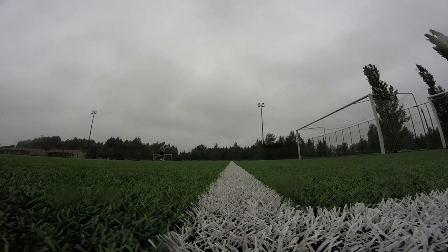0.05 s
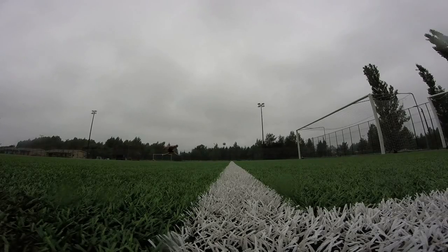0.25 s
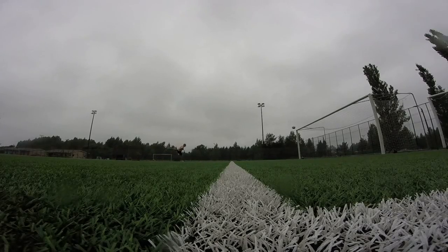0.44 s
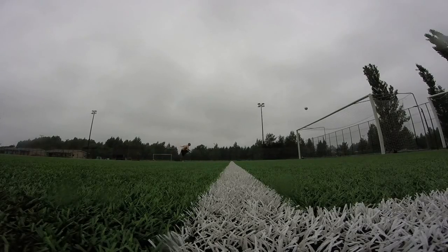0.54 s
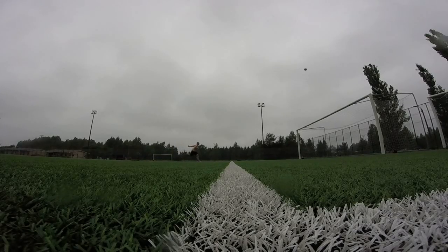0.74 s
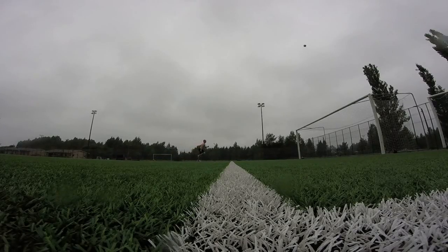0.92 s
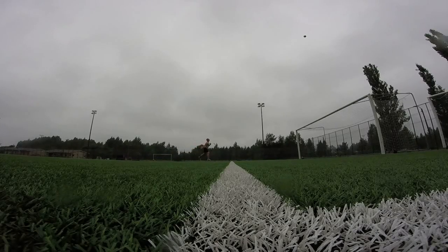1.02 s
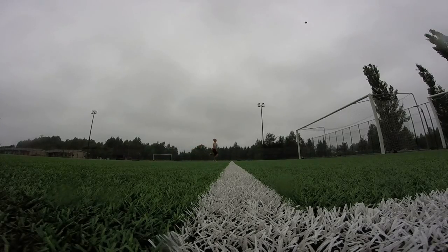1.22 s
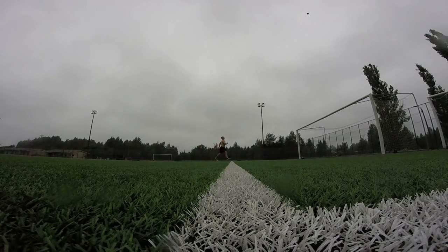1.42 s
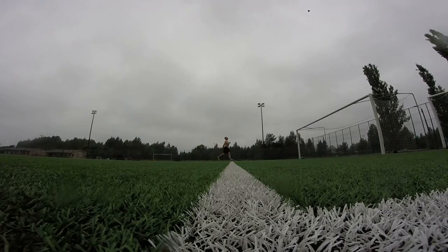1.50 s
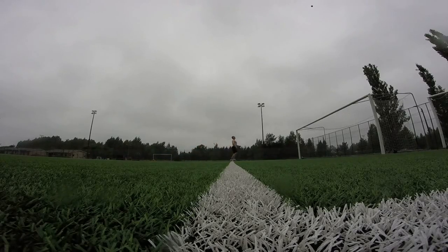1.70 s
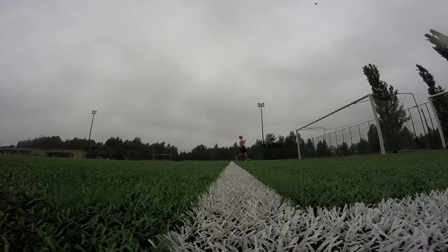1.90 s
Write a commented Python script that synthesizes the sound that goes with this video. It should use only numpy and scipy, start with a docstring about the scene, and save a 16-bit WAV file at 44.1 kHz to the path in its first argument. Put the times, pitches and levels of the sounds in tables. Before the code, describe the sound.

On an open grass pitch, a dull heavy kick is soon followed by the ball thudding on the crossbar with a sharp metallic clang; fittings rattle, the frame shudders, a few soft steps follow, in mono.

```python
"""On an open grass pitch a football is kicked and hits the metal crossbar: two deep thuds.
The second thud comes with a crack and a clang: bursts of noise, over fading tones of the ringing frame.
Each ball blow is made of two sharp pulses, a low swing, fluttering noise and short fading tones.
Shaped noise makes the rattling fittings, the far edge's echo, the scuffing feet and the light wind.
A wavering low tone is a distant drone."""
import sys
import numpy as np
from scipy.fft import rfft, irfft, next_fast_len
from scipy.io import wavfile
from scipy.ndimage import map_coordinates

SR = 44100
rng = np.random.default_rng(int(sys.argv[2]) if len(sys.argv) > 2 else 0)


def generate_wav(sig):
    """Save sig (samples, or channels by samples) to the path in sys.argv[1] as 16-bit PCM at SR."""
    pcm = np.round(np.clip(np.atleast_2d(sig).T, -1, 1) * 32767).astype(np.int16)
    wavfile.write(sys.argv[1], SR, pcm)


N = 85995  # length of the scene [samples]


def amp(db):
    """Turn decibels into a gain."""
    return 10 ** (np.asarray(db) / 20)


def unit(x):
    """Scale a sound to an rms of 1."""
    return x / np.sqrt(np.mean(x ** 2) + 1e-20)


def since(start_s):
    """Seconds since a moment, zero before it."""
    return np.maximum(np.arange(N) / SR - start_s, 0)


def gains(points, hz):
    """Read a gain off a curve of (frequency [Hz], level [dB]) points, on a log frequency axis."""
    point_hz, point_db = np.transpose(points)
    return amp(np.interp(np.log(hz + 1), np.log(point_hz + 1), point_db))


def filtered(x, response):
    """Weigh each frequency of a sound by a response curve."""
    size = next_fast_len(N + SR // 2)  # spare room so the end does not wrap onto the start
    spectrum = rfft(x, size) * response(np.fft.rfftfreq(size, 1 / SR))
    return irfft(spectrum, size)[:N]


def noise(colour):
    """Random hiss shaped by a colour curve, with an rms of 1."""
    hiss = rng.standard_normal(N)
    return unit(filtered(hiss, lambda hz: gains(colour, hz)))


def wobble(rate):
    """A smooth random curve through `rate` random points a second."""
    points = rng.standard_normal(1024)
    return map_coordinates(points, [np.arange(N) * rate / SR], mode="wrap")


def fade(t, t60):
    """Exponential decay that falls by 60 dB in t60 seconds."""
    return np.exp(-np.log(1000) * t / t60)


def bump(centre_s, width_s):
    """A smooth bell-shaped rise and fall in time."""
    return np.exp(-np.square((since(0) - centre_s) / width_s))


def burst(colour, start_s, db, rise, t60):
    """Noise that swells quickly and dies away."""
    t = since(start_s)
    envelope = (1 - np.exp(-t / rise)) * fade(t, t60)
    return amp(db) * noise(colour) * envelope


def ring(modes, start_s, rough, rate):
    """A struck body's fading tones, each slightly rough because its phase wanders."""
    t = since(start_s)
    tones = 0
    for hz, db, t60 in modes:
        wander = rough * wobble(rate) * (1 - np.exp(-t * rate))
        tones = tones + amp(db) * fade(t, t60) * np.sin(2 * np.pi * hz * t + wander)
    rise_s = .0012
    return tones * (1 - np.exp(-np.square(t / rise_s)))


def slap(colour, start_s, size=4096):
    """One sharp pressure pulse of peak 1, with nothing before its start."""
    # folding the cepstrum packs the pulse's energy as early as its colour allows
    cepstrum = irfft(np.log(gains(colour, np.fft.rfftfreq(size, 1 / SR))))
    cepstrum[1:size // 2] *= 2
    cepstrum[size // 2 + 1:] = 0
    pulse = irfft(np.exp(rfft(cepstrum)))
    pulse = pulse / np.abs(pulse).max()
    return np.interp(np.arange(N) - start_s * SR, np.arange(size), pulse, left=0, right=0)


def thump(start_s, db, hz, length):
    """A heavily damped low swing that starts softly and carries no steady push."""
    low_cut_hz, soft_s = 55, .0005
    t = since(start_s)
    envelope = np.exp(-(t / length) ** 4) * (1 - np.exp(-np.square(t / soft_s)))
    swing = -amp(db) * np.sin(2 * np.pi * hz * t) * envelope
    return filtered(swing, lambda f: 1 - np.exp(-np.square(f / low_cut_hz)))


# colour of the light wind and far trees: (frequency [Hz], relative level [dB])
AIR_COLOUR = [(20, -6), (35, -2), (55, 7), (80, 6), (110, 3), (160, 1), (250, 1), (400, -1.5), (620, -.5),
              (830, 0), (1000, -5.5), (1250, -15), (1600, -20), (2050, -21), (2400, -26), (3000, -23),
              (3700, -19), (4500, -20), (5400, -28), (6700, -22.5), (7700, -32), (8400, -31), (9500, -38),
              (12300, -41), (13500, -48), (15000, -49)]


def air():
    """Light wind is gently swaying noise; the far-off drone is a low tone wavering in pitch and level."""
    drone_hz, drone_db, waver_rate = 70.5, -48.5, 8  # the rate is in random points a second
    tone = np.sin(2 * np.pi * drone_hz * since(0) + .8 * wobble(waver_rate))
    drone = tone * amp(2 * wobble(waver_rate))
    wind = amp(-42 + .5 * wobble(6)) * noise(AIR_COLOUR)
    return wind + amp(drone_db) * unit(drone)


# colour of the dull noise under the kick and in the echo: (frequency [Hz], relative level [dB])
ECHO_COLOUR = [(20, -30), (70, -12), (160, 4), (300, -1), (470, -2), (600, -5), (1050, -8), (1350, -23),
               (1700, -24), (2500, -40), (6000, -55), (15000, -70)]


def echo():
    """Dull noise begins just before the kick and fades under it; a later swell is the far edge's echo."""
    far_edge = amp(-32.5) * noise(ECHO_COLOUR) * bump(centre_s=.858, width_s=.038)
    dull_fade = burst(ECHO_COLOUR, start_s=.2295, db=-37, rise=.003, t60=.45)
    return far_edge + dull_fade


# footfalls: (time [s], thump level before its low cut [dB], thump pitch [Hz], scuff level [dB])
STEPS = [(0.1315, -40, 200, -28.5), (0.1400, -26, 160, -37), (0.540, -30, 165, -39),
         (1.2708, -22.5, 145, -42), (1.666, -33, 170, -41)]
# colour of the dull scuff under each foot: (frequency [Hz], relative level [dB])
SCUFF_COLOUR = [(20, -25), (80, -8), (220, 1), (700, -3), (1100, -12), (1700, -32), (5000, -50),
                (15000, -70)]
# the boot brushing the grass: (time [s], level [dB], rise [s], fade by 60 dB [s])
BRUSHES = [(0.2163, -38, .0005, .012), (0.2335, -46, .0004, .008), (0.238, -40.5, .0005, .016)]
# colour of the brushed grass: (frequency [Hz], relative level [dB])
BRUSH_COLOUR = [(1500, -15), (3500, -2), (7000, -4), (9000, 0), (12000, -5), (14000, -22)]


def feet():
    """Each step is a low thump with a noisy scuff; the boot swishes through the grass as short noise."""
    steps = 0
    for start_s, thump_db, hz, scuff_db in STEPS:
        steps = steps + thump(start_s, thump_db, hz, length=.012)
        steps = steps + burst(SCUFF_COLOUR, start_s, scuff_db, rise=.001, t60=.07)
    swish = sum(burst(BRUSH_COLOUR, *row) for row in BRUSHES)
    return steps + swish


# sharp metal contacts: (time [s], level [dB], rise [s], fade by 60 dB [s])
CLACKS = [(0.6105, -31, .003, .1), (0.6207, -14, .0003, .008), (0.6215, -33.5, .001, .06),
          (0.6366, -26, .0003, .015), (0.653, -40.5, .002, .07), (0.682, -41, .001, .02),
          (0.698, -39.5, .006, .12), (0.725, -35, .006, .09), (0.829, -50, .003, .14),
          (0.8415, -40, .001, .035)]
# colour of the sharp contacts: (frequency [Hz], relative level [dB])
CLACK_COLOUR = [(800, -15), (1700, -7), (2400, -19), (2750, -1), (3400, 1), (4400, -4), (5300, -13),
                (6500, 0), (7600, -15), (8600, -15), (9600, -25), (11800, -15), (13500, -23), (15000, -24)]
# colour of a jingling loose fitting: (frequency [Hz], relative level [dB])
JINGLE_COLOUR = [(2500, -20), (3800, 0), (5300, -9), (6500, -2), (7050, 7), (7700, -7), (10000, -9),
                 (12000, -9.5), (15000, -13)]
# tones on which that fitting rings on: (frequency [Hz], level [dB], fade by 60 dB [s])
FITTING_MODES = [(6830, -45, .3), (6980, -48, .25), (7139, -42.5, .28)]


def fittings():
    """The bar cracks and shaken fittings clack in short noise bursts; a loose one jingles and rings on."""
    jingle_s = .730
    clacks = sum(burst(CLACK_COLOUR, *row) for row in CLACKS)
    jingle = burst(JINGLE_COLOUR, jingle_s, db=-38, rise=.005, t60=.11)
    return clacks + jingle + ring(FITTING_MODES, jingle_s, rough=.9, rate=140)


# the swaying frame knocks in its joints: (time [s], level before the low cut [dB], pitch [Hz], length [s])
KNOCKS = [(0.649, -23, 760, .006), (0.6605, -23, 400, .006), (0.707, -25, 410, .014),
          (0.727, -29, 135, .015), (0.830, -27, 230, .011)]


def knocks():
    """Dull knocks as the goal sways, and a brief hum that rises and falls in pitch."""
    centre_s, width_s, top_hz, bend_hz = .848, .05, 482, 70  # the pitch sags by bend_hz one width away
    away = np.minimum(np.square((since(0) - centre_s) / width_s), 20)
    phase = 2 * np.pi * np.cumsum(top_hz - bend_hz * away) / SR + .4 * wobble(30)
    hum = amp(-36.5) * np.exp(-away) * np.sin(phase)
    return hum + sum(thump(*row) for row in KNOCKS)


# tones of the goal frame: (frequency [Hz], relative level [dB], fade by 60 dB [s])
FRAME_MODES = [(235, -31, .4), (332, -19, .12), (415, -39, .6), (465, -32, .9), (530, -29, .35),
               (626, -30, .5), (738, -32, .4), (856, -36, .55), (928, -33, .45), (1124, -40, .35),
               (1222, -41, .3), (1489, -46, .3), (1755, -47, .3), (3165, -47, .35), (3478, -46, .35),
               (3523, -47, .35), (3958, -48, .35)]
# colour of the frame's dense shudder: (frequency [Hz], relative level [dB])
SHUDDER_COLOUR = [(20, -25), (60, -8), (140, 1), (280, 1), (550, -1), (950, -7), (1300, -20), (2100, -26),
                  (2450, -34), (3300, -20), (4400, -23), (5300, -33), (6700, -21), (7700, -34),
                  (10000, -45), (15000, -51)]


def frame(hit_s):
    """The struck goal clangs, rings and shudders; the shudder's treble dies a little sooner."""
    t = since(hit_s)
    shudder = noise(SHUDDER_COLOUR)
    low = filtered(shudder, lambda hz: hz < 2400)
    treble = shudder - low
    tail = (t > 0) * (low * fade(t, t60=1.35) + treble * fade(t, t60=1.25))
    # the clang starts early, as the ball grazes the frame
    clang = burst(SHUDDER_COLOUR, hit_s - .010, db=-20, rise=.004, t60=.15)
    tones = amp(-2) * ring(FRAME_MODES, hit_s, rough=.6, rate=35)
    return amp(-28.5) * tail + clang + tones


# the ball's two blows, each: (time [s], thump level before its low cut [dB], thump pitch [Hz],
# thump length [s], slap level [dB], release level relative to the slap [dB], contact time [s])
KICK = (0.2339, -2.5, 110, .011, -2.2, -9.5, .0105)
BAR_HIT = (0.6208, -3.3, 100, .0115, -6.6, 0, .0109)
# colour of each slap: (frequency [Hz], relative level [dB])
KICK_SLAP_COLOUR = [(20, -22), (90, -5), (250, 3), (380, -1), (620, 0), (900, -6.5), (1300, -16.5),
                    (1550, -38), (1800, -60), (4000, -72), (15000, -80)]
BAR_SLAP_COLOUR = [(20, -22), (90, -5), (300, 4), (620, -2), (950, -6), (1250, -13), (1750, -22),
                   (2450, -35), (3400, -30), (6000, -42), (15000, -58)]
# colour of the skin's flutter while the ball is squashed: (frequency [Hz], relative level [dB])
FLUTTER_COLOUR = [(20, -40), (200, -8), (350, 0), (650, 1), (900, -5), (1300, -15), (1600, -34),
                  (2000, -55), (15000, -80)]
# tones of the ball's skin and air: (frequency [Hz], level [dB], fade by 60 dB [s])
BALL_MODES = [(245, -17, .05), (392, -28, .05), (500, -26, .055), (615, -20, .06), (725, -25, .05),
              (856, -26, .05), (972, -31, .05), (1147, -36, .05), (1236, -35, .05)]


def ball(start_s, thump_db, hz, length, slap_db, release_db, contact_s, colour):
    """The ball slaps on contact, flexes, flutters, springs free, and its skin and air ping."""
    # springing free gives a second pulse, turned upside down
    release = amp(release_db) * slap(colour, start_s + contact_s)
    slaps = amp(slap_db) * (slap(colour, start_s) - release)
    flutter = amp(-22) * noise(FLUTTER_COLOUR) * bump(start_s + .008, width_s=.007)
    flex = thump(start_s + .0009, thump_db, hz, length)  # the ball's body follows the slap
    return slaps + flutter + flex + ring(BALL_MODES, start_s, rough=.1, rate=40)


def scene():
    """Crossbar, field, feet and kick, added together in one channel."""
    bar_blow = ball(*BAR_HIT, BAR_SLAP_COLOUR)
    goal = bar_blow + frame(hit_s=BAR_HIT[0]) + knocks() + fittings()
    pitch = air() + feet()
    kick = ball(*KICK, KICK_SLAP_COLOUR)
    return (pitch + kick + goal + echo())[None]


def record(dry):
    """A very steep cut removes the highest treble."""
    top_hz = 15250
    return filtered(dry[0], lambda hz: 1 / (1 + (hz / top_hz) ** 160))[None]


dry = scene()
out = record(dry)
generate_wav(out)
```